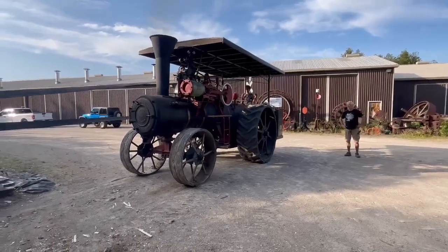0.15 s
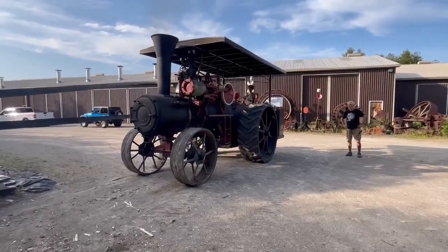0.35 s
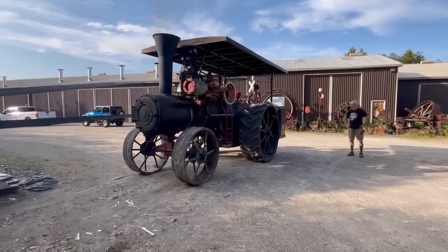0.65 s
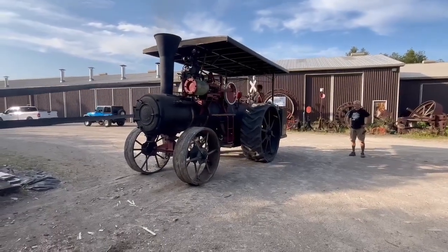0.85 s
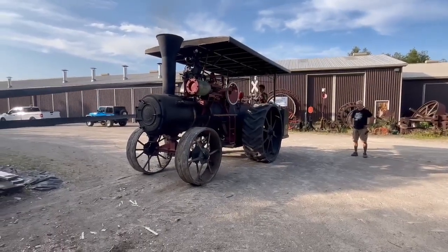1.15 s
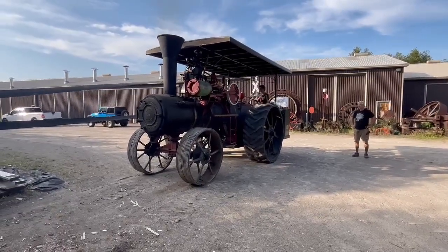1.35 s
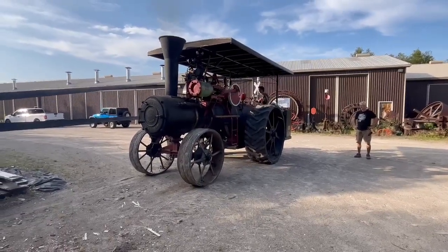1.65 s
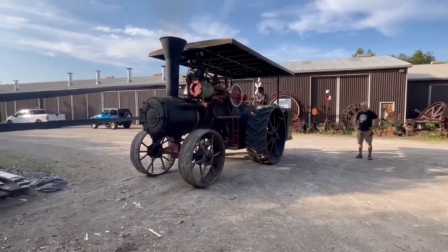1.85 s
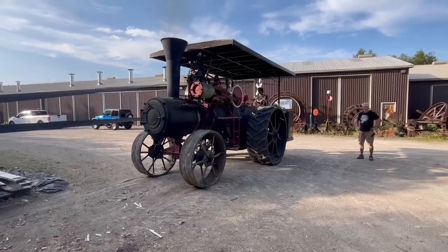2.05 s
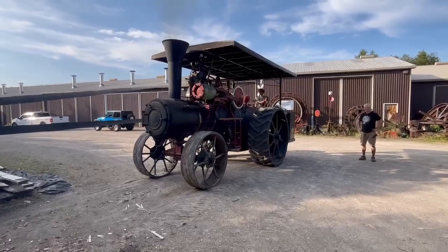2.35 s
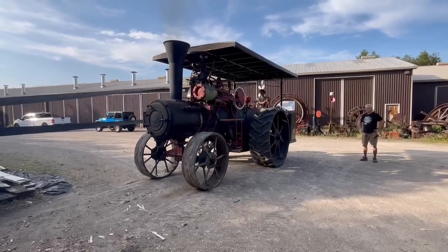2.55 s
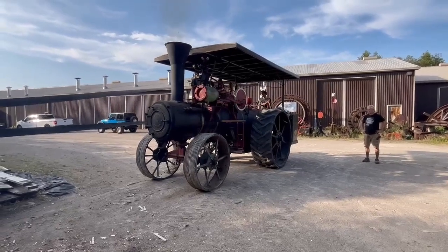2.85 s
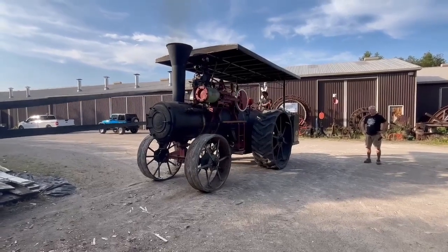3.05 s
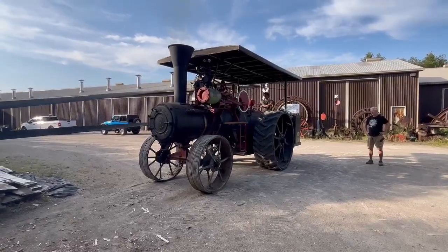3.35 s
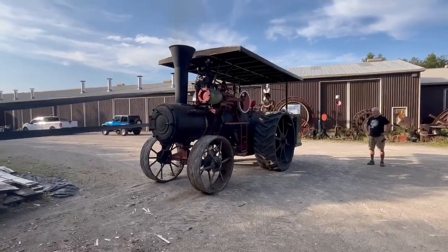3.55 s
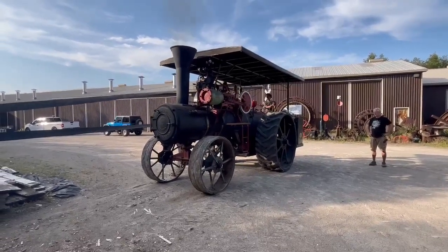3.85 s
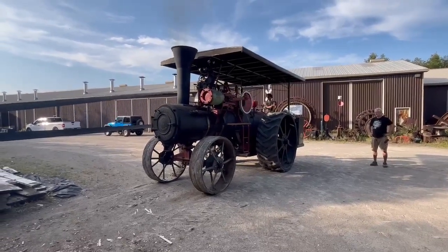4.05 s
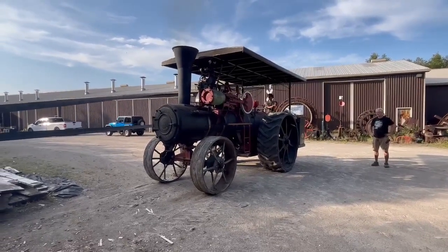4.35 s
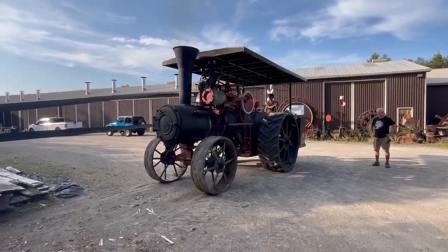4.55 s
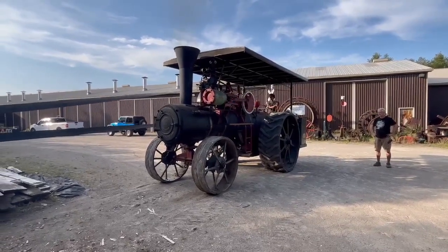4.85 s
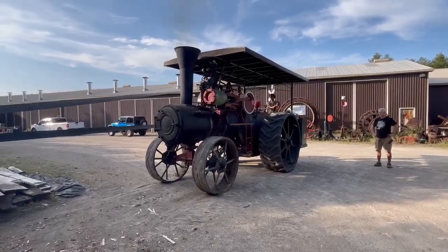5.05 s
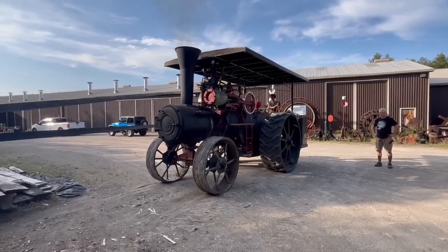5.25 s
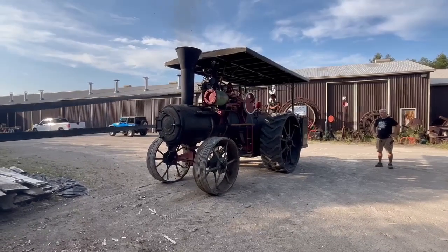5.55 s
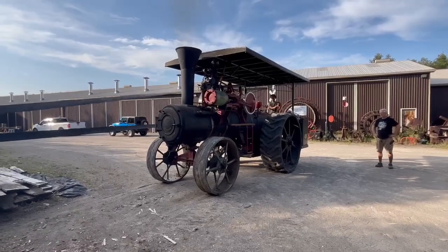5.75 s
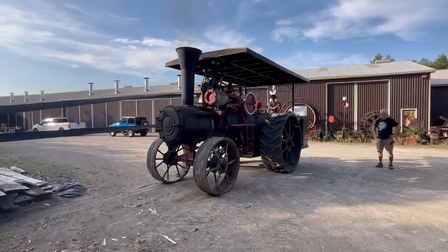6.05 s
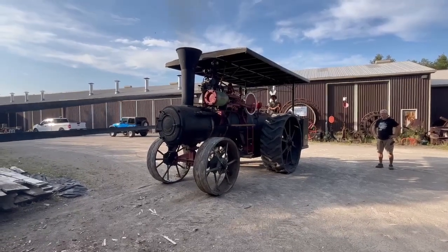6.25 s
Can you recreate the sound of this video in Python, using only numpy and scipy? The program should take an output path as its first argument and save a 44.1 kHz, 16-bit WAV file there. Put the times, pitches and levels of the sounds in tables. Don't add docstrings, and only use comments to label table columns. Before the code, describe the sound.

A steam traction engine chuffs fast and evenly outdoors, deep puffs and breathy steam blasts over leaking hiss and a low fan rumble.

```python
import sys
import numpy as np
from scipy import signal
from scipy.fft import rfft, irfft, next_fast_len
from scipy.io import wavfile
from scipy.ndimage import uniform_filter1d, map_coordinates

SR = 44100
rng = np.random.default_rng(int(sys.argv[2]) if len(sys.argv) > 2 else 0)


def natural_amplitude(level_db):
    exponent = np.asarray(level_db, float) / 20
    return 10 ** exponent


def transcribe(u):
    v = np.clip(np.atleast_2d(u).T, -1, 1)
    q = np.round(v * 32767).astype(np.int16)
    wavfile.write(sys.argv[1], SR, q)


N = 283122

# f/Hz, width/Hz, level/dB
SMOKEBOX = [(58, 15, 0), (162, 37, -10.5)]
# f/Hz, width/Hz
ROAR_MODES = [(172, 31), (255, 30)]
# peak t/s, 2nd mode f/Hz, 2nd mode level/dB, 3rd mode level/dB
HEAD_END = [(0.05, 194, -16, -23.5), (0.317, 176.5, -11.5, -20.5), (.5783, 163.6, -21, -18),
            (.8427, 177.6, -15.5, -23.5), (1.1069, 160, -21, -17.5), (1.3674, 174, -13.5, -21.5),
            (1.6304, 217, -16, -18), (1.8963, 178.3, -13.5, -23.5), (2.1597, 178, -17, -16),
            (2.4197, 178.5, -14, -20), (2.6875, 167, -16, -21), (2.9444, 175, -20, -17.5),
            (3.1994, 180, -12, -17), (3.4793, 169, -24, -47), (3.7238, 177, -23, -17.5),
            (3.988, 167, -10.5, -47), (4.2515, 176, -16, -46), (4.5176, 200, -25, -21),
            (4.768, 213, -17, -17), (5.0354, 215, -18, -14.5), (5.2915, 171, -14, -21.5),
            (5.5472, 162, -20.5, -22), (5.8144, 179, -14, -19), (6.068, 201, -11.5, -14.5),
            (6.337, 188.5, -15.5, -22.5)]
# peak t/s, 2nd mode f/Hz, 2nd mode level/dB, 3rd mode level/dB
CRANK_END = [(.197, 143, -29, -16.5), (0.471, 192, -17, -21), (.7154, 236, -19.5, -21.5),
             (0.9824, 169, -19.5, -15.5), (1.238, 160, -33, -16), (1.503, 199, -16.5, -20),
             (1.7845, 200, -19, -23), (2.0407, 159, -15, -26), (2.297, 194.4, -13, -16),
             (2.5543, 194, -18.5, -21), (2.8194, 185, -18, -40), (3.086, 172, -24.5, -16.5),
             (3.337, 174, -14, -15), (3.6022, 169, -15.5, -15.5), (3.862, 178, -12.5, -14.5),
             (4.1375, 221, -22.5, -22.5), (4.385, 178, -12, -17), (4.6443, 204, -18.5, -30),
             (4.9063, 228, -32, -18.5), (5.1718, 176, -12.5, -19.5), (5.428, 195, -18, -21),
             (5.703, 169, -15.5, -20.5), (5.945, 214, -14.5, -24), (6.2035, 197, -18.5, -27)]
# head end level/dB, crank end level/dB
BLASTS = [(-23.5, -25.5), (-23.5, -23.5), (-24.5, -23.5), (-22, -23), (-25, -24.5), (-24.5, -24),
          (-21.5, -25), (-23, -24), (-25, -23.5), (-23.5, -23.5), (-24.5, -24), (-25, -24.5), (-24.5, -26),
          (-25.5, -23), (-26.5, -24.5), (-24.5, -26), (-25.5, -24), (-24.5, -23.5), (-25, -23.5),
          (-25, -24.5), (-25.5, -23.5), (-26.5, -25), (-26.5, -24.5), (-24.5, -25), (-25, -25)]
# f/Hz, level/dB
BLAST_TONE = [(200, -62), (360, 10.5), (500, -4.5), (700, 2.5), (1000, -1), (1500, 1), (2000, -10.5),
              (3000, -15.5), (5000, -20), (8000, -31), (11500, -36.5)]
# f/Hz, level/dB
BLOW_TONE = [(200, -20), (400, -6), (1000, -5.5), (1600, -7), (2200, -16), (4000, -21.5), (7000, -38.5),
             (11500, -54.5)]
# t/s, f/Hz, level/dB
SQUEAKS = [
    (0.777, 3230, -27.5),
    (.925, 3090, -26),
    (1.374, 3130, -31),
    (.43, 5940, -35.5),
    (.63, 5890, -35),
    (.91, 5840, -42),
    (1.16, 5940, -32),
]
# t/s, length/s, level/dB
WISPS = [
    (3.8, .2, -54),
    (4.65, .3, -51.5),
]
# f/Hz, level/dB
LEAK_TONE = [(800, -18), (2000, 1.5), (3000, -3.5), (4500, -4), (6500, -9), (8000, -18), (11000, -21),
             (11800, -19.5)]
# f/Hz, level/dB
FAN_TONE = [(15, -37), (30, -10), (45, -0.5), (75, 3.5), (130, -3), (260, -0.5), (315, -10), (370, -7.5),
            (520, -18), (1000, -21.5), (1600, -23), (2500, -45.5), (6000, -49)]
# f/Hz, phase/rad
LEAD = [(0, 0), (90, .04), (170, .54), (350, .6), (1400, 1.75), (1950, 3.1), (2300, 3.3), (3200, 8.8),
        (3900, 6.1), (4500, 5.8), (5100, 9.2), (5600, 9.7), (6600, 12.6), (11500, 17)]
# f/Hz, likeness/1
ALIKE = [(60, .995), (130, .94), (250, .96), (500, .55), (1400, .62), (1700, .3), (2100, .7), (2500, .1),
         (3900, .38), (4800, .15), (5450, .5), (6600, .68), (7300, .2), (10000, .4)]
# f/Hz, level/dB
BALANCE = [(110, 0), (190, 0), (340, 3), (610, 2.8), (1100, -.5), (1960, -2.7), (3510, -1), (6280, 0),
           (9000, -4), (11500, -4)]
# f/Hz, level/dB
MASK = [(500, -30), (1200, -12), (1950, -6.5), (2300, -6.5), (2700, -6.5), (3400, -4), (4200, -4),
        (5500, -4.5), (6600, -4.5), (8000, -6), (10000, -5), (11000, -4), (11700, 1)]

PIPE_HZ = 86.07
FIRST_S, TURN_S, CRANK_AFTER_S = .048, .26318, .1384
QUICKEN_S = 7e-5


def unit(x):
    return x / np.sqrt(np.mean(x ** 2, axis=-1, keepdims=True) + 1e-20)


def along(points, hz):
    f, v = np.transpose(points)
    return np.interp(np.log(hz + 1), np.log(f + 1), v)


def filtered(x, response):
    m = next_fast_len(x.shape[-1] + SR // 2)
    spectrum = rfft(x, m) * response(np.fft.rfftfreq(m, 1 / SR))
    return irfft(spectrum, m)[..., :x.shape[-1]]


def mode(f, hz, width):
    return 1j * f * width / (hz * hz - f * f + 1j * f * width)


def pipe(f, back):
    return 1 / (1 - np.clip(back, 0, .9) * np.exp(-2j * np.pi * f / PIPE_HZ))


def rush(response, patchy_db):
    z = signal.stft(rng.standard_normal((2, N + 512)), nperseg=512)[2]
    field = rng.standard_normal(z.shape[1:])
    field = uniform_filter1d(uniform_filter1d(field, 6, 0), 6, 1)
    patchy = z * natural_amplitude(patchy_db * field / field.std())
    pair = signal.istft(patchy, nperseg=512)[1][:, :N]
    return unit(filtered(pair, response))


def impulses(times, levels_db):
    return np.bincount(np.round(times * SR).astype(int), natural_amplitude(levels_db), N)


def swells(times, levels_db, rise, fall):
    t = np.arange(SR // 3) / SR
    shape = (1 - np.exp(-t / rise)) ** 2 * np.exp(-t / fall)
    return signal.fftconvolve(impulses(times, levels_db), shape / shape.max())[:N]


def wobble(rate):
    knots = rng.standard_normal(int(N * rate / SR) + 4)
    return map_coordinates(knots, [np.arange(N) * rate / SR])


def releases():
    turn = np.arange(len(HEAD_END))
    head = FIRST_S + TURN_S * turn - QUICKEN_S * turn ** 2
    return np.ravel([head, head + CRANK_AFTER_S], "F")[:-1]


def puffs():
    s = releases() + .0015
    size_db = np.resize([-15.5, -13.5], len(s)) + rng.normal(0, .7, len(s))

    def response(f):
        box = sum(natural_amplitude(db) * mode(f, hz, width) for hz, width, db in SMOKEBOX)
        draught = natural_amplitude(-12) * np.conj(mode(f, 145, 127))
        mouth = 1 + np.exp(-2j * np.pi * f / 90.5)
        soft = np.exp(-(f / 400) ** 4)
        return (box + draught) * mouth * soft

    return filtered(impulses(s, size_db) * SR / 100, response)


def roar():
    lag_s, rise_s, fall_s = 0.0062, 0.0059, 0.0091
    out, t = np.zeros((2, N + SR)), np.arange(SR // 8) / SR
    for s, (peak_s, pitch_hz, *levels_db) in zip(releases(), sorted(HEAD_END + CRANK_END)):
        late_s = peak_s - s + lag_s
        ramp = (t - (peak_s - s) - lag_s) / np.where(t < late_s, rise_s, fall_s)
        tail = 0.046 * np.exp(-((t - .025) / 0.013) ** 2)
        jet = (np.exp(-ramp ** 2 / 2) + tail) * rng.standard_normal((2, len(t)))
        start = round((s - .012) * SR)
        for hz, (_, width), db in zip((pitch_hz, ROAR_MODES[1][0]), ROAR_MODES, levels_db):
            ring = lambda f: mode(f, hz, width) * mode(f, hz, 1.7 * width)
            out[:, start:start + len(t)] += natural_amplitude(db - 5.5) * unit(filtered(jet, ring))
    return out[:, :N]


def blast(blast_db):
    s = releases()
    body = rush(lambda f: natural_amplitude(along(BLAST_TONE, f)) * pipe(f, back=.36), patchy_db=1.5)
    edge = rush(lambda f: mode(f, 8800, 2300) ** 2, patchy_db=1.5)
    body_size = swells(s - .009, blast_db + 2.0, rise=0.012, fall=0.028)
    edge_size = swells(s - .022, blast_db - 29, rise=.03, fall=.016)
    return body_size * body + edge_size * edge


def valve_gear(blast_db):
    s = releases()
    times = s + np.resize([.06, .056], len(s))
    levels_db = blast_db + np.resize([-12, -3.0], len(s)) + rng.normal(0, 0.99, len(s))
    keep = times < N / SR
    size = swells(times[keep], levels_db[keep], rise=0.0035, fall=0.047)
    return size * rush(lambda f: natural_amplitude(along(BLOW_TONE, f)), patchy_db=4.5)


def squeaks():
    out, t = np.zeros(N), np.arange(SR // 20) / SR
    for s, hz, db in SQUEAKS:
        drift = np.cumsum(rng.normal(0, 0.085, len(t)))
        swell = np.exp(-((t - .02) / 0.0081) ** 2)
        start = round((s - .02) * SR)
        out[start:][:len(t)] += natural_amplitude(db) * swell * np.sin(2 * np.pi * hz * t + drift)
    return out


def drain_cock():
    now = np.arange(N) / SR
    size = sum(natural_amplitude(db) * np.exp(-((now - at) / length) ** 2) for at, length, db in WISPS)
    return size * rush(lambda f: mode(f, 9300, 2500) ** 2, patchy_db=1.8)


def leaks():
    now, s = np.arange(N) / SR, releases()
    scatter_db = rng.normal(0, 1.5, len(s))
    pressure = 1 + swells(s - .015, -10 + scatter_db, rise=.02, fall=.04)
    gland_db = np.full(len(s) // 2, -7.5)
    pressure = pressure + swells(s[1::2] + 0.022, gland_db, rise=0.035, fall=0.026)
    level_db = -37 + 3 * np.exp(-now / 0.96) + 0.95 * wobble(6.5)
    return natural_amplitude(level_db) * pressure * rush(lambda f: natural_amplitude(along(LEAK_TONE, f)), patchy_db=2.5)


def fan_rumble():
    now = np.arange(N) / SR
    level_db = -22 - 0.05 * now - 0.27 * wobble(2.35)
    return natural_amplitude(level_db) * rush(lambda f: natural_amplitude(along(FAN_TONE, f)), patchy_db=2.0)


def thinned(x):
    lead_in = 391
    pair = np.pad([x[0] + x[1], x[0] - x[1]], ((0, 0), (lead_in, 0)))
    hz, _, z = signal.stft(pair, SR, "cosine", nperseg=2048)
    power = np.abs(z) ** 2

    def band_power(size):
        bands = power[:, :1024].reshape(2, -1, size, power.shape[2])
        return np.repeat(bands.mean(axis=2), size, axis=1)

    around = uniform_filter1d(power.mean(axis=0), size=90, axis=0)
    around = uniform_filter1d(around, size=2, axis=1)
    limit = (around * natural_amplitude(2 * along(MASK, hz))[:, None])[:1024]
    z[:, :1024] *= (band_power(4) > 1.5 * limit) & (band_power(16) > 1.15 * limit)
    mid, side = signal.istft(z, SR, "cosine", nperseg=2048)[1][:, lead_in:lead_in + N]
    return np.array([mid + side, mid - side]) / 2


def scene():
    blast_db = np.ravel(BLASTS)[:-1]
    steam = roar() + blast(blast_db) + valve_gear(blast_db)
    shared, apart = steam + drain_cock() + leaks() + fan_rumble()
    point = puffs() + squeaks()
    turn = lambda f: np.arccos(np.clip(along(ALIKE, f), 0, 1)) / 2
    lead = lambda f: np.exp([[.5j], [-.5j]] * np.interp(f, *np.transpose(LEAD)))
    tilt = lambda f: natural_amplitude([[.5], [-.5]] * along(BALANCE, f)) * lead(f)
    both = filtered(shared, lambda f: tilt(f) * np.cos(turn(f))) + filtered(point, tilt)
    return both + filtered(apart, lambda f: tilt(f) * np.sin(turn(f)) * [[1], [-1]])


def roll_off(x):
    return signal.sosfilt(signal.butter(12, 11840, fs=SR, output="sos"), x)


def record(dry):
    mix = thinned(np.clip(dry, -1, 1))
    return roll_off(mix)


dry = scene()
out = record(dry)
transcribe(out)
```